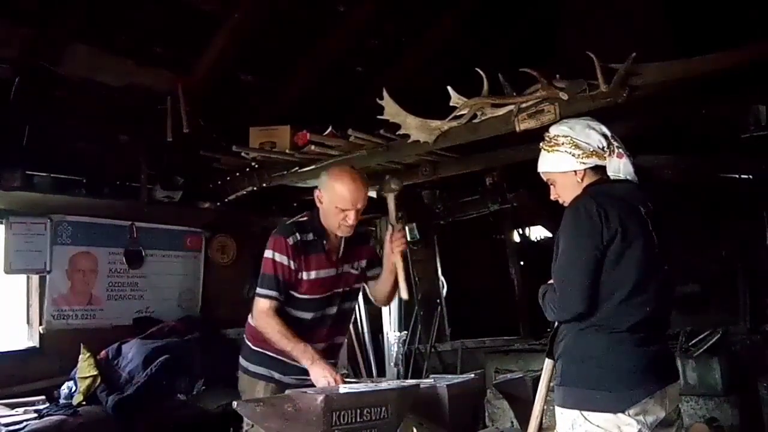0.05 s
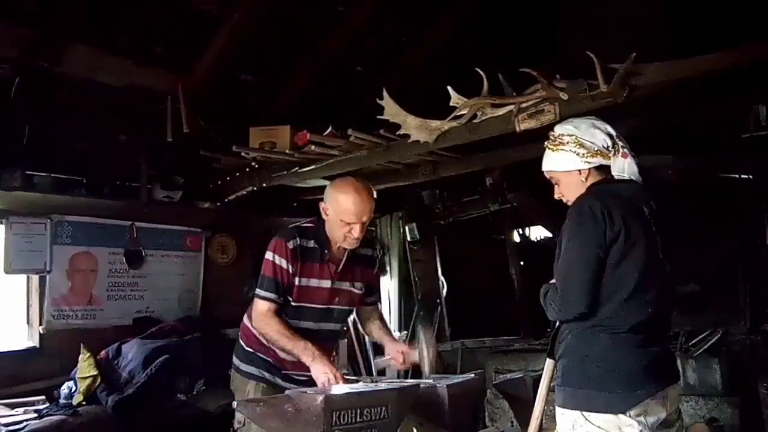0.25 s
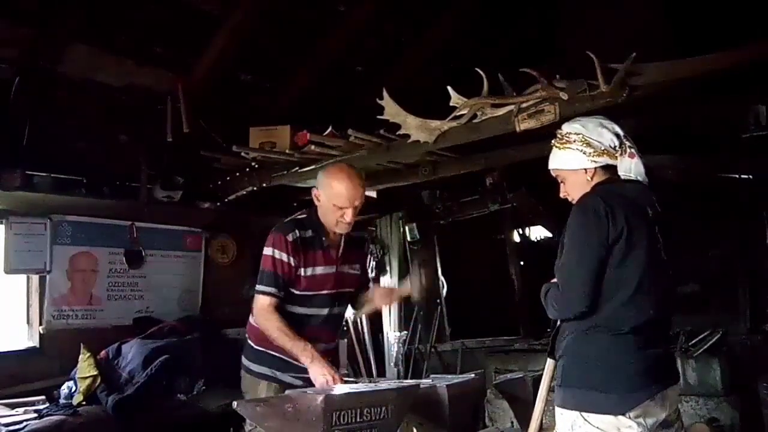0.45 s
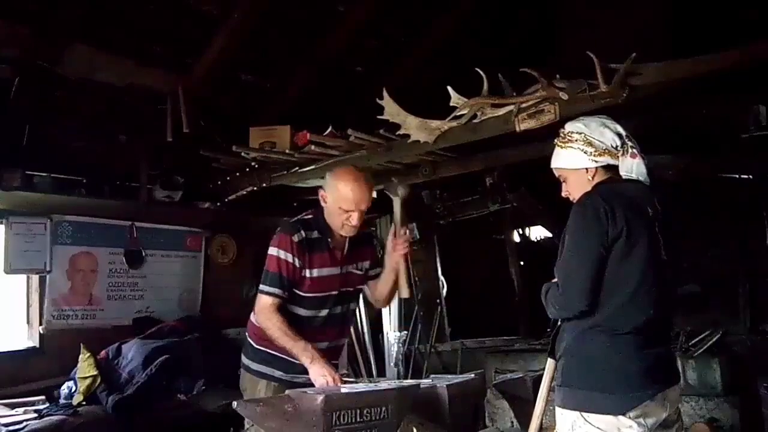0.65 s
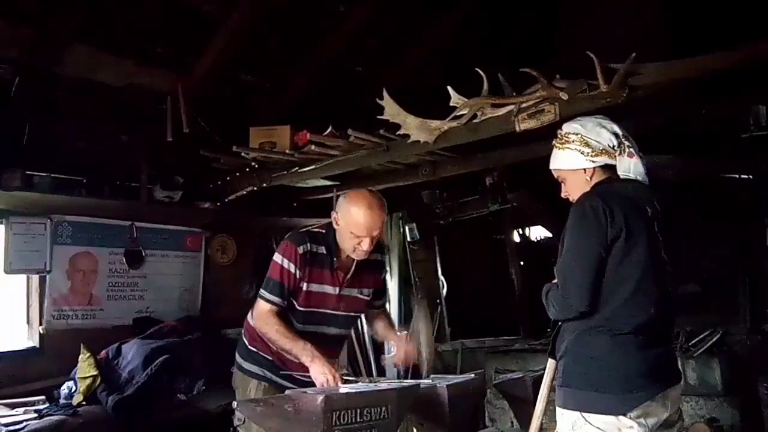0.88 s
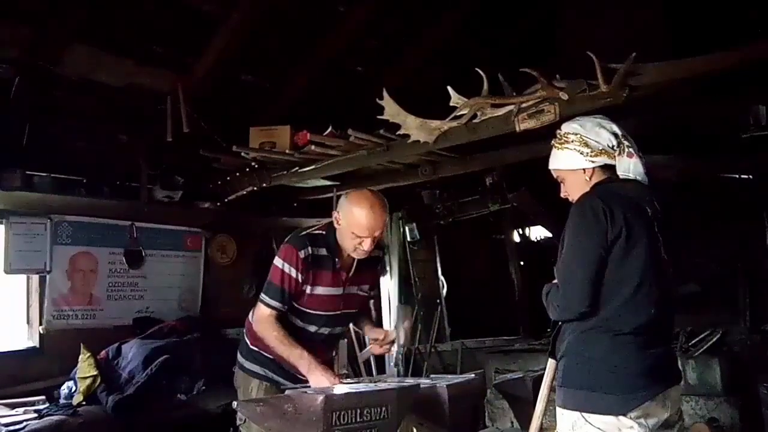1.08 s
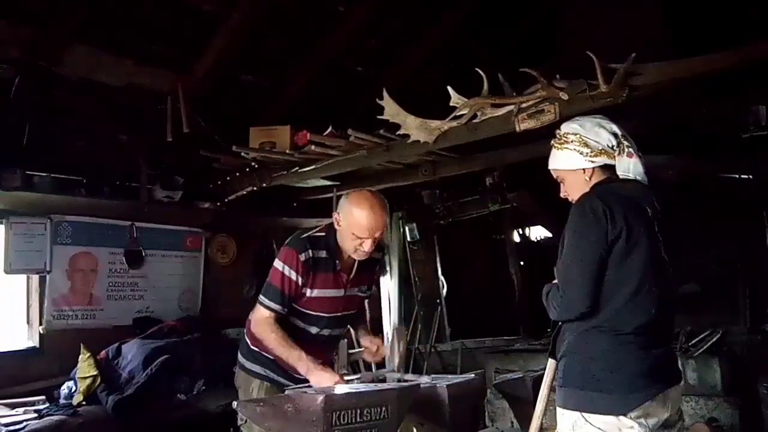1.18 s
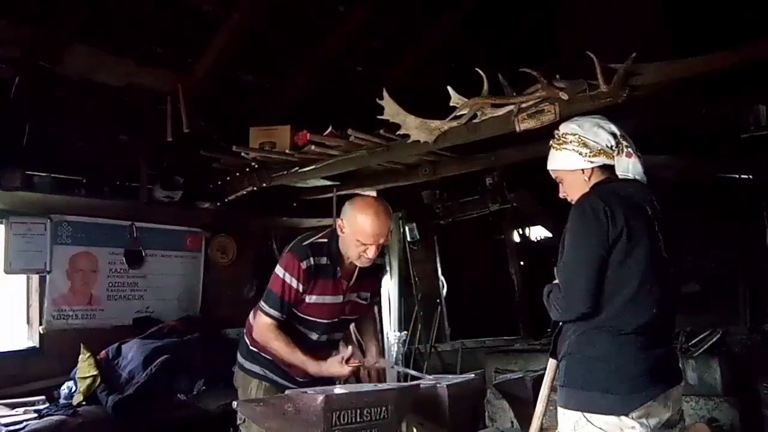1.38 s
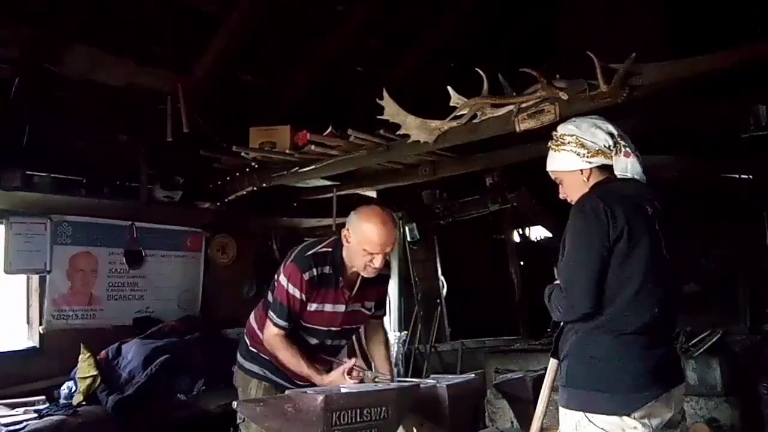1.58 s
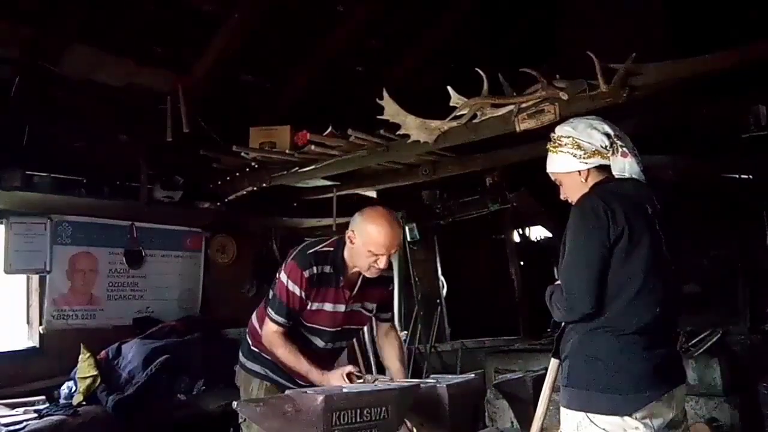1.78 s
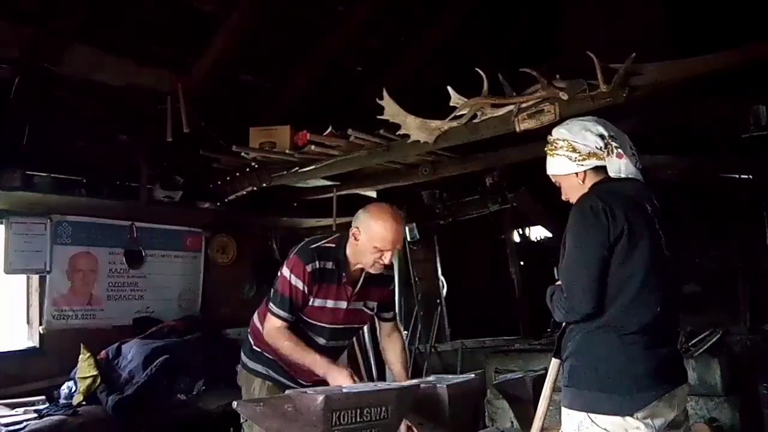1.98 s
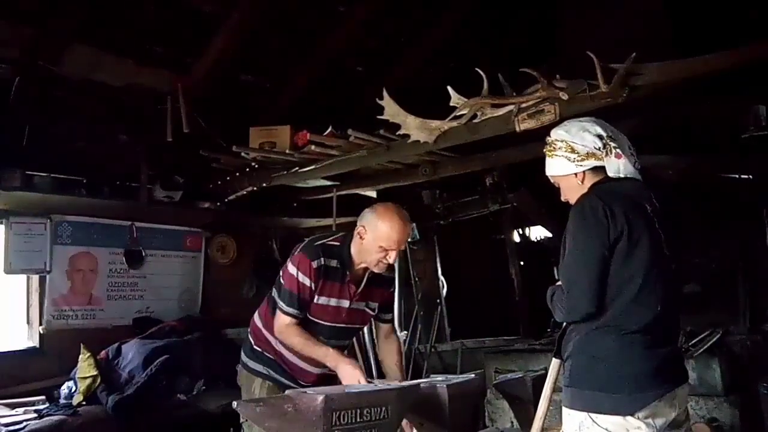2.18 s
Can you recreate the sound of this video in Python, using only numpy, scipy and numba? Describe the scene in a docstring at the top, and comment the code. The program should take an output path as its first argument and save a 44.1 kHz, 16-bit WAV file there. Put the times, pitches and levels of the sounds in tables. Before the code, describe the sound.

Two hammer blows on an anvil crack and clang close by in a low workshop, leaving a high, fading ring. Over faint room rumble come light metal scrapes and a quiet clunk as the hammer comes to rest.

```python
"""Two blows on an anvil

A smith strikes a small workpiece twice in a low, cluttered workshop, over room rumble and a faint whine.
Each blow cracks, clangs, thumps the stand and sets the steel anvil ringing; an automatic gain control
ducks and the ring swells back. He shifts his stance, slides the piece and clunks the hammer down."""
import sys
import numpy as np
from scipy import signal
from scipy.fft import rfft, irfft
from scipy.io import wavfile
from scipy.ndimage import uniform_filter1d
from numba import njit

SR = 44100
rng = np.random.default_rng(int(sys.argv[2]) if len(sys.argv) > 2 else 0)


def output_pcm(signal):
    """Save a mono or channel-first signal as 16-bit PCM at the path in sys.argv[1].

    Samples are clipped to [-1, 1] before scaling.
    """
    pcm = np.clip(np.atleast_2d(signal).T, -1, 1) * 32767
    wavfile.write(sys.argv[1], SR, np.round(pcm).astype(np.int16))


N = 99225
T = np.arange(N) / SR
FREQS = np.maximum(np.fft.rfftfreq(N, 1 / SR), 1)


def undb(db):
    """Decibels to gain."""
    return 10 ** (np.asarray(db) / 20)


def pan(pan_db):
    """Constant-power stereo gains; pan_db is left minus right."""
    gains = undb(np.array([[pan_db], [-pan_db]]) / 2)
    return gains / np.sqrt(np.mean(gains ** 2))


def curve(table, hz, column=1):
    """Read a table column along a log-frequency axis."""
    table = np.array(table, float)
    return np.interp(np.log(hz), np.log(table[:, 0]), table[:, column])


def noise(eq_db):
    """Wide stereo noise, shaped by an EQ curve and brought to rms 1."""
    shaped = irfft(rfft(rng.standard_normal((2, N))) * undb(eq_db), N)
    return shaped / shaped.std()


def centre_bass(wide, corner_hz=323):
    """Narrow the low end of wide noise, so both ears hear much the same bass."""
    mid, side = rfft(wide)
    alike = .85 / (1 + (FREQS / corner_hz) ** 2)
    return irfft(mid * np.sqrt((1 + alike) / 2) + side * np.sqrt((1 - alike) / 2) * [[1], [-1]], N)


def drift(rate_hz):
    """Smooth random modulation for each ear, with a spread of 1."""
    points = 2048
    lowpass = np.exp(-(np.fft.rfftfreq(points, N / SR / points) / rate_hz) ** 2)
    slow = irfft(rfft(rng.standard_normal((2, points))) * lowpass)
    return np.array([np.interp(T, np.linspace(0, N / SR, points), ear) for ear in slow / slow.std()])


def swell(peak_s, half_width_s):
    """Bell-shaped fade in and out."""
    return np.exp(-((T - peak_s) / half_width_s) ** 2)


def struck(start_s, attack_s, t60_s):
    """Impact envelope: linear attack, exponential decay."""
    age = np.maximum(T - start_s, 0)
    return np.minimum(age / attack_s, 1) * np.exp(-np.log(1000) * age / t60_s)


def ring(modes, start_s, level_db, tilt_db_per_octave=0, attack_s=.008):
    """Decaying modes that waver at each ear as the smith's movement shifts the standing waves."""
    waver_hz, ear_phase_rad = 5.45, np.array([[0], [1.707]])
    out = np.zeros((2, N))
    for hz, mode_db, t60_s, pan_db in modes:
        depth = .3 * min(hz / 5000, 1.5) ** .84  # higher modes waver more
        phase = 2 * np.pi * (hz * T + rng.random()) + ear_phase_rad + depth * drift(waver_hz)
        waver = np.exp(depth * drift(waver_hz) + .072 * drift(rate_hz=70))  # slow sway, slight shiver
        gain = undb(level_db + mode_db + tilt_db_per_octave * np.log2(hz / modes[0][0])) * pan(pan_db)
        out += gain * np.sqrt(2) * np.sin(phase) * waver * struck(start_s, attack_s, t60_s)
    return out


def burst(bands, start_s, level_db, attack_s=.0088):
    """Dense reflections of an impact; each third of an octave dies at its own rate."""
    spectrum = rfft(centre_bass(noise(curve(bands, FREQS))))
    thirds = np.round(3 * np.log2(np.maximum(FREQS, 40)))
    out = np.zeros((2, N))
    for third in np.unique(thirds):
        hz = 2 ** (third / 3)
        envelope = struck(start_s, attack_s, curve(bands, hz, column=2))
        out += irfft(spectrum * (thirds == third), N) * pan(curve(bands, hz, column=3)) * envelope
    return undb(level_db) * out


def thud(start_s, level_db, pitch_hz, t60_s):
    """One low, damped resonance."""
    tone = np.sqrt(2) * np.sin(2 * np.pi * pitch_hz * (T - start_s))
    return undb(level_db) * tone * struck(start_s, 1 / pitch_hz, t60_s)


# Room tone EQ: freq_hz, gain_db
ROOM_EQ = [(25, -27), (55, -15.5), (100, -11.5), (150, 1), (220, -8), (320, -15.5), (550, -32.5),
           (1200, -35.5), (2500, -35.5), (6000, -40), (15000, -48.5)]
def room_rumble(level_db=-56.5, flutter_db=1.5):
    """A low, uneven bed of workshop rumble."""
    gain = undb(level_db + flutter_db * drift(rate_hz=14)[0])
    return gain * centre_bass(noise(curve(ROOM_EQ, FREQS)))


# Tones of the whine: pitch_hz, gain_db
WHINE_TONES = [(2548, -2), (2792, 0)]
# Swells of the whine: peak_s, half_width_s, level_db
WHINE_SWELLS = [(.03, 0.081, -58.5), (.57, .09, -55)]
def faint_whine(roughness_rad=.35):
    """Two thin, slightly rough tones come and go."""
    tones = sum(undb(db) * np.sin(2 * np.pi * hz * T + drift(8) + roughness_rad * drift(200))
                for hz, db in WHINE_TONES)
    return tones * sum(undb(db) * swell(peak_s, half_width_s) for peak_s, half_width_s, db in WHINE_SWELLS)


# Steel-on-steel scrape EQ: freq_hz, gain_db
SLIDE_EQ = [(500, -16.5), (1300, -7), (2500, -5), (5500, 3.5), (7500, -1), (10000, -16), (15000, -15.5)]
# Moves of the workpiece: peak_s, half_width_s, level_db, tilt_db_per_octave
SLIDE_CUES = [(0.037, 0.097, -65, -3), (1.849, 0.017, -58.5, -2), (1.941, .012, -65.5, -0.5),
              (2.023, 0.019, -50.5, 2.5), (2.067, 0.042, -62.5, 0), (2.145, 0.029, -46.5, 0.5)]
def workpiece_slides(grain_db=2.3):
    """The piece rubs across the anvil face in short, grainy scrapes."""
    out = np.zeros((2, N))
    for peak_s, half_width_s, level_db, tilt in SLIDE_CUES:
        friction = noise(curve(SLIDE_EQ, FREQS) + tilt * np.log2(FREQS))
        gain = undb(level_db + grain_db * drift(rate_hz=120)[0])
        out += gain * friction * swell(peak_s, half_width_s)
    return pan(pan_db=-6.5) * out


# Long modes of the anvil: pitch_hz, gain_db, t60_s, pan_db
ANVIL_MODES = [(3628.9, -15, 2.927, -1), (4965, -21.5, 1.5, -5), (6217.3, -25.5, 1.95, -6),
               (7185, -14, 1.218, -3.5), (7483, -25, 2.2, 1), (10760, -55, 2.23, -4),
               (12958, -50, .8, -19.5), (13244, -39.5, 1.1, -23), (15080, -48, .8, -24.5),
               (15362, -33, 0.99, -27.5), (15428, -27, .65, -25.5)]
# Contact crack as the room returns it: freq_hz, gain_db, t60_s, pan_db
CRACK_BANDS = [(35, -14.5, 0.21, 0), (93, -4, 0.27, -1.5), (180, 7, 0.28, -2), (430, -5.5, 0.23, -7),
               (850, -3.5, 0.2, -7.5), (1380, -6, 0.21, -4), (1900, -0.5, 0.2, -1.5),
               (2570, -4.5, 0.21, -3.5), (3650, -1.5, 0.2, -4.5), (4400, -7.5, .17, -5.5),
               (5130, -1.5, 0.2, -6.5), (7300, -4.5, 0.22, -0.5), (9500, -13.5, 0.13, -1),
               (11900, -13.5, .16, -17.5), (13600, -17, 0.19, -24.5), (14900, 0, .14, -26),
               (16000, -23.5, 0.12, -27)]
# Short modes of hammer and workpiece: pitch_hz, gain_db, t60_s, pan_db
CLANG_MODES = [(1908, -19, .17, -3), (2017, -24, 0.21, -3), (3182, -18.5, 0.26, -0.5),
               (3284, -16, 0.16, -3.5), (3903, -28.5, 0.19, -6), (4768, -23, .4, -4.5),
               (5060, -8.5, 0.096, -5.5), (7068, -27, .43, -3), (9184, -28, .31, -3), (9930, -40, 0.38, -3),
               (11170, -42.5, 0.34, -12), (11650, -34.5, 0.42, -15.5), (12200, -37, .33, -18.5),
               (14338, -40, .28, -24), (14790, -37.5, .38, -27.5)]
# Hammer hits: start_s, crack_db, ring_db, ring_tilt_db_per_octave, clang_db, thump_db
BLOW_CUES = [(0.206, -4, 1, 1, -0.5, -14.5), (0.8615, 2.5, 8, -4.5, 10, -9.5)]
def hammer_blows(choke_s=.008):
    """Each blow cracks, clangs, thumps the stand and replaces the anvil's ring with a new one."""
    hits, tail = np.zeros((2, N)), np.zeros((2, N))
    for start_s, crack_db, ring_db, tilt, clang_db, thump_db in BLOW_CUES:
        tail *= np.clip(1 - (T - start_s) / choke_s, 0, 1)
        tail += ring(ANVIL_MODES, start_s, ring_db, tilt, attack_s=.094)  # builds up in the room
        hits += burst(CRACK_BANDS, start_s, crack_db)
        hits += ring(CLANG_MODES, start_s, clang_db)
        hits += thud(start_s, thump_db, pitch_hz=178.8, t60_s=.26)
    return hits + tail


# Soft steps: start_s, level_db
STEP_CUES = [(1.195, -47), (1.646, -35)]
def footfalls():
    """Dull thuds underfoot as the smith shifts his stance."""
    return sum(thud(start_s, level_db, pitch_hz=140, t60_s=.07) for start_s, level_db in STEP_CUES)


# Noisy body of the clunk: freq_hz, gain_db, t60_s, pan_db
CLUNK_BANDS = [(60, -6, 0.67, -6), (197, -1.5, 1, -4), (413, -4, 0.49, -12), (770, 0.5, 0.37, -4),
               (1210, 1, .22, -3), (1860, 5, 0.19, 1), (2700, -1, 0.19, -10), (4000, -14.5, 0.23, -1),
               (8000, -24.5, 0.43, -7), (15000, -53, 0.19, -11)]
# Ringing modes of the clunk: pitch_hz, gain_db, t60_s, pan_db
CLUNK_RING = [(690, -10.5, .15, -10), (790, -9, 0.16, -1), (1478, -9.5, 0.34, -5)]
def hammer_set_down(start_s=2.165, level_db=-30):
    """The hammer comes to rest with a clunk and a short ring."""
    return burst(CLUNK_BANDS, start_s, level_db) + ring(CLUNK_RING, start_s, level_db)


def scene():
    """The dry stereo mix: room bed, blows and foley."""
    return room_rumble() + faint_whine() + workpiece_slides() + hammer_blows() + footfalls() + hammer_set_down()


@njit
def follow(power, attack_s, release_s):
    """Envelope follower with separate attack and release."""
    out, level = np.empty(len(power)), 0.
    for i in range(len(power)):
        lag_s = attack_s if power[i] > level else release_s
        level += (power[i] - level) / (lag_s * SR)
        out[i] = level
    return out


def record(dry, threshold_db=-15, ratio=14, high_cut_hz=15800):
    """Gain control ducks on each blow and recovers; a steep low-pass trims the top."""
    power = uniform_filter1d(np.mean(dry ** 2, axis=0), size=256)
    envelope = follow(power, attack_s=.0013, release_s=.037)
    gain = (1 + envelope / undb(threshold_db) ** 2) ** ((1 / ratio - 1) / 2)
    high_cut = signal.ellip(10, .2, 80, high_cut_hz, fs=SR, output="sos")
    return signal.sosfilt(high_cut, dry * gain)


dry = scene()
out = record(dry)
output_pcm(out)
```